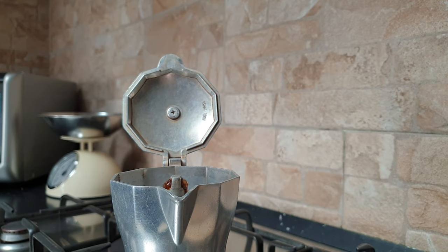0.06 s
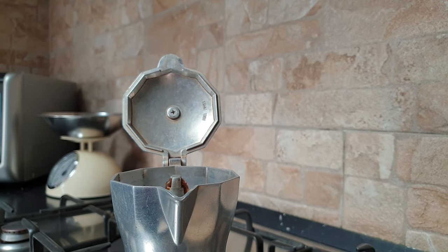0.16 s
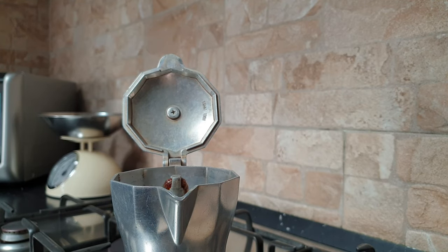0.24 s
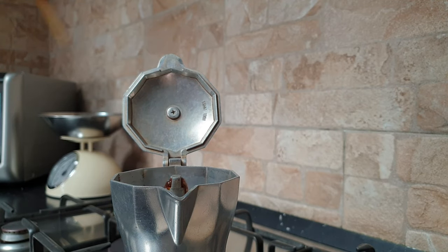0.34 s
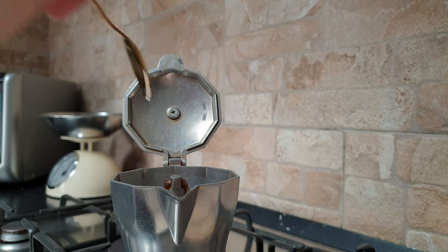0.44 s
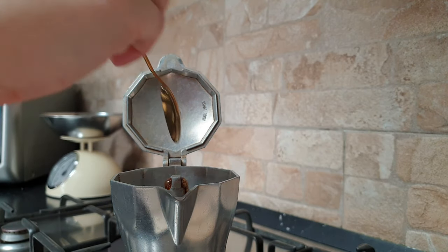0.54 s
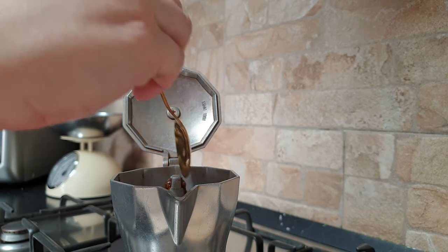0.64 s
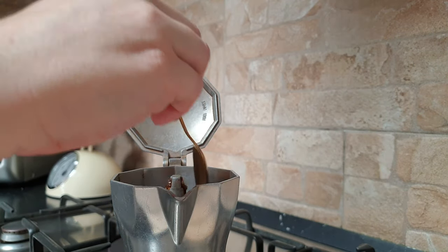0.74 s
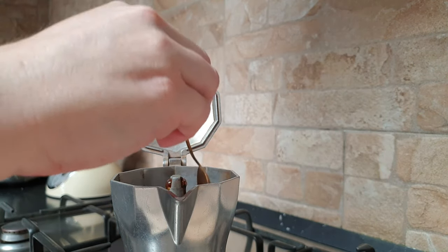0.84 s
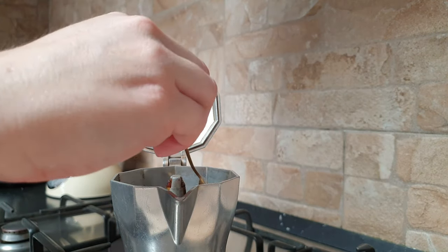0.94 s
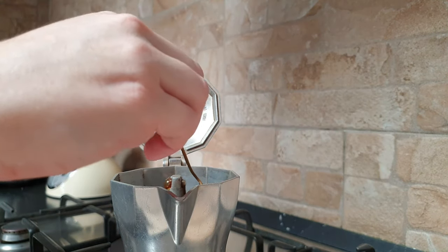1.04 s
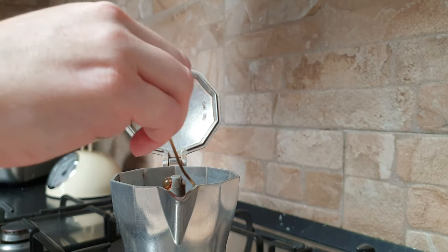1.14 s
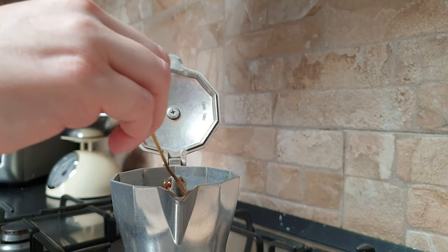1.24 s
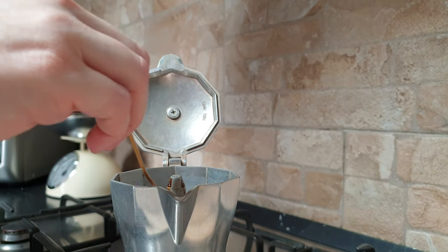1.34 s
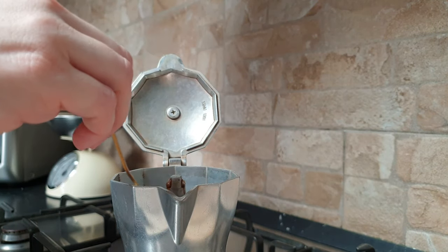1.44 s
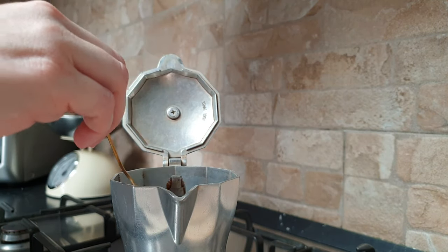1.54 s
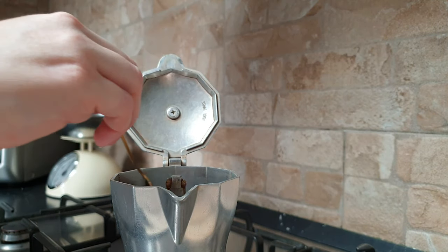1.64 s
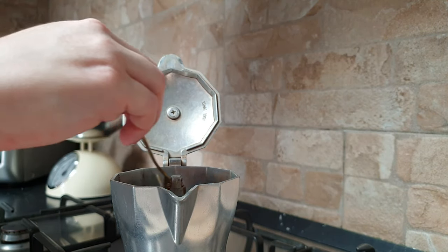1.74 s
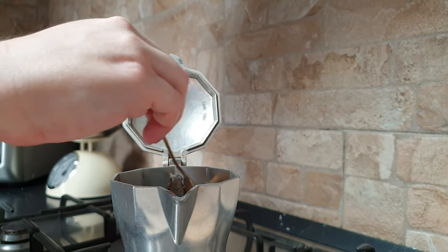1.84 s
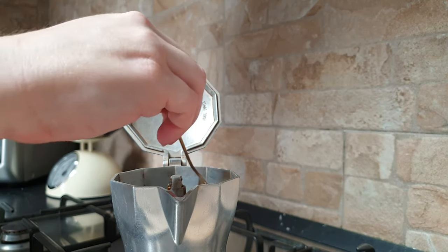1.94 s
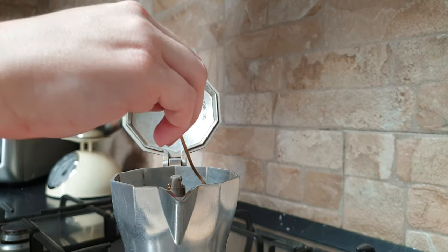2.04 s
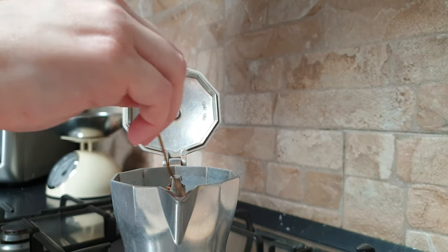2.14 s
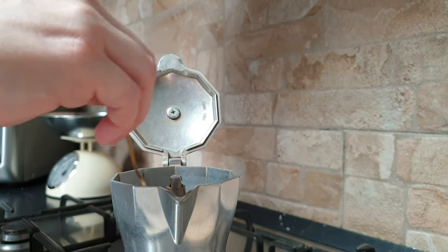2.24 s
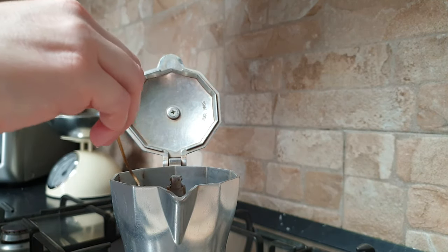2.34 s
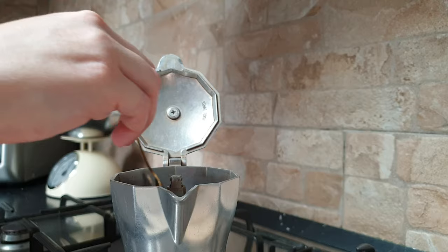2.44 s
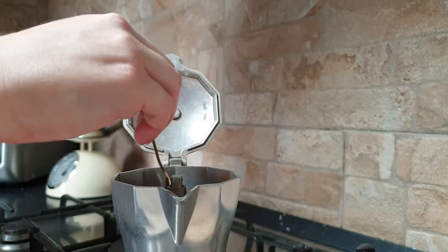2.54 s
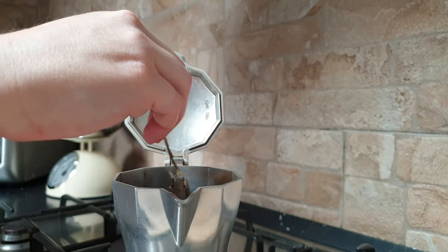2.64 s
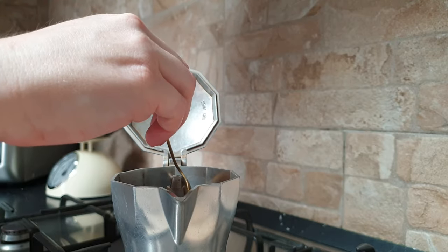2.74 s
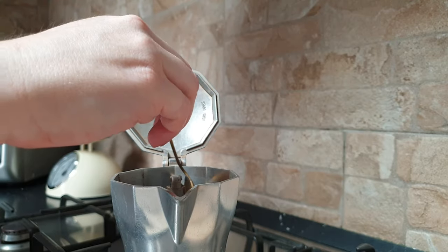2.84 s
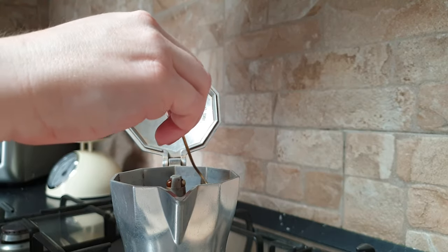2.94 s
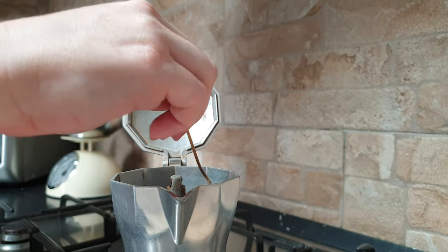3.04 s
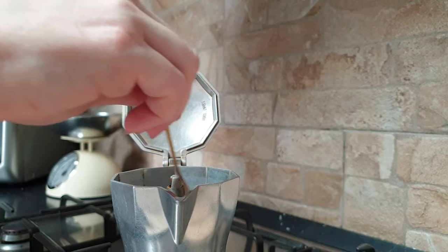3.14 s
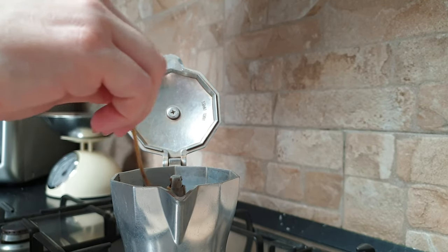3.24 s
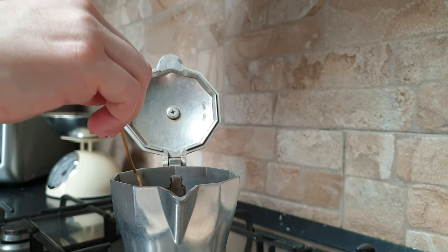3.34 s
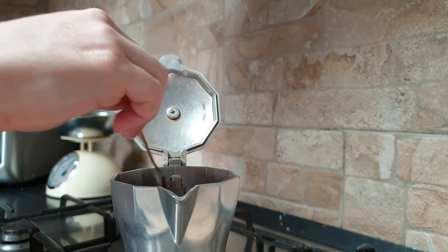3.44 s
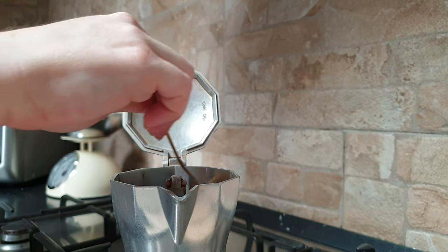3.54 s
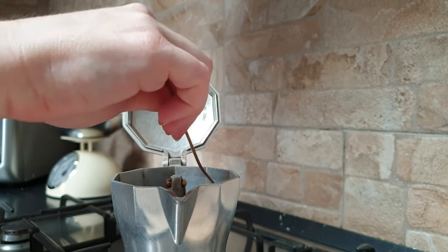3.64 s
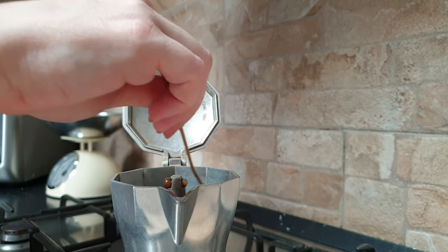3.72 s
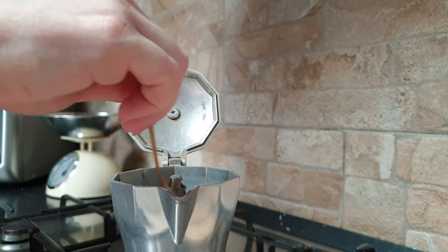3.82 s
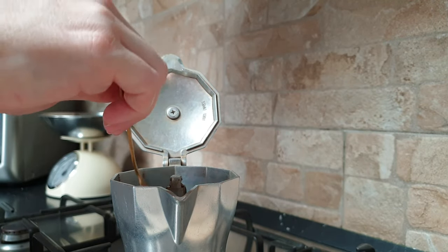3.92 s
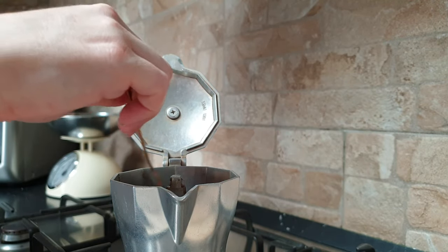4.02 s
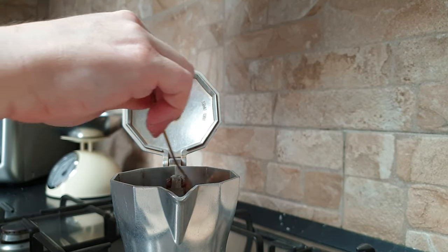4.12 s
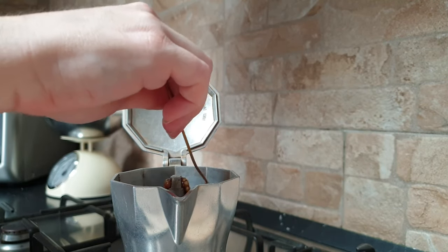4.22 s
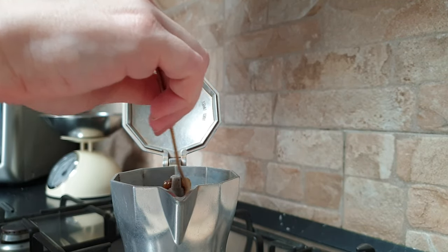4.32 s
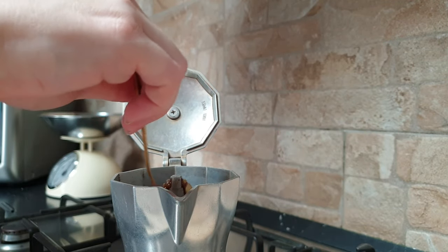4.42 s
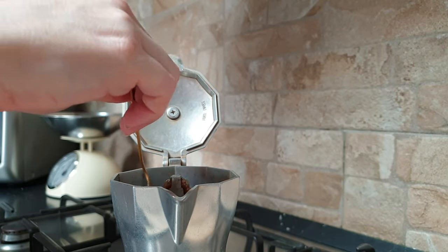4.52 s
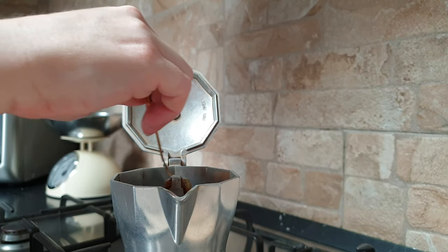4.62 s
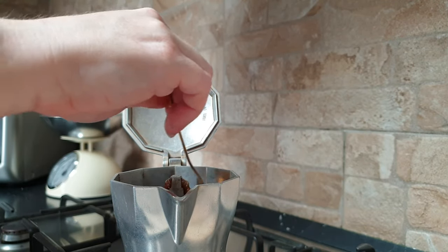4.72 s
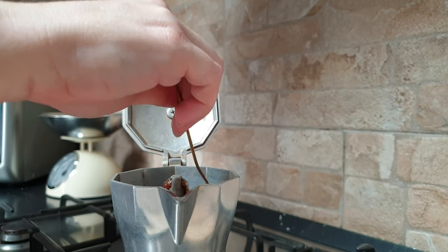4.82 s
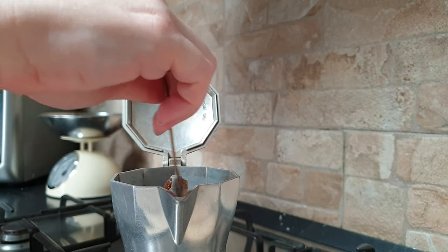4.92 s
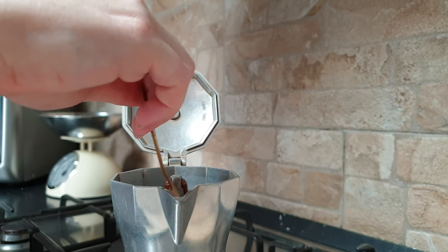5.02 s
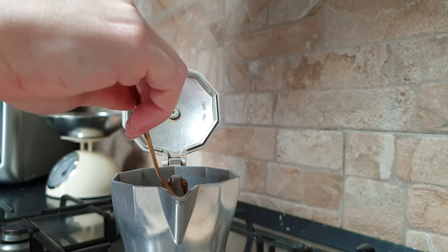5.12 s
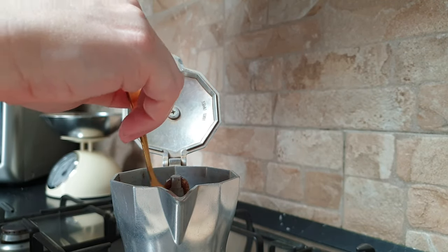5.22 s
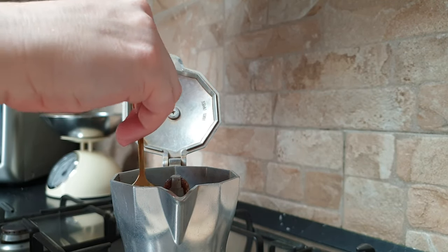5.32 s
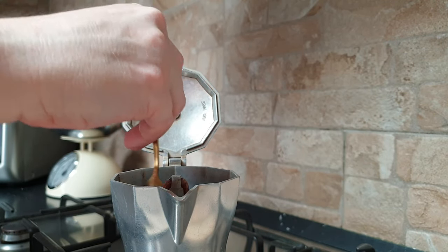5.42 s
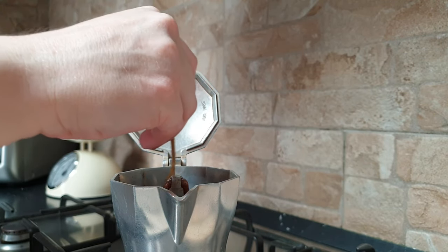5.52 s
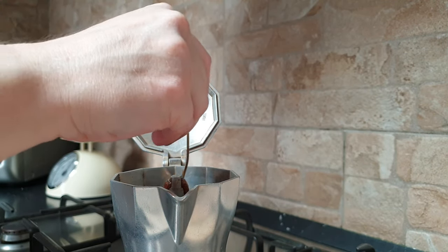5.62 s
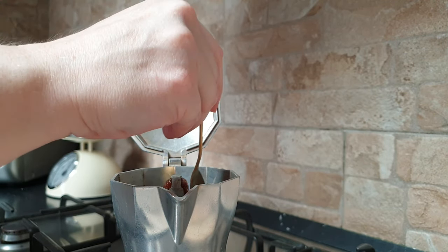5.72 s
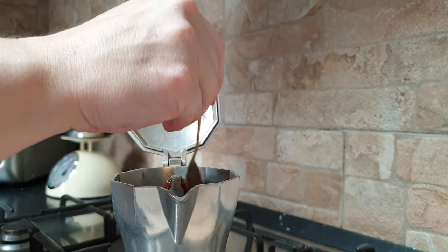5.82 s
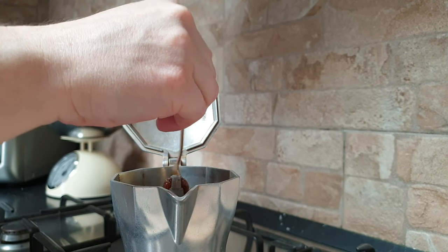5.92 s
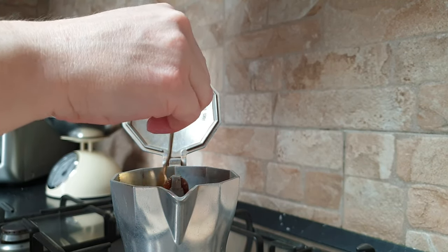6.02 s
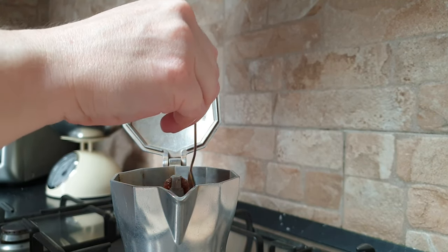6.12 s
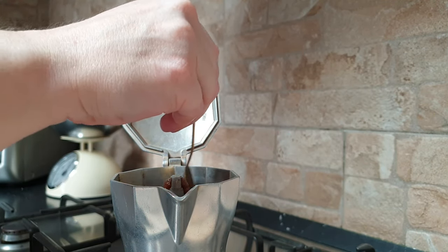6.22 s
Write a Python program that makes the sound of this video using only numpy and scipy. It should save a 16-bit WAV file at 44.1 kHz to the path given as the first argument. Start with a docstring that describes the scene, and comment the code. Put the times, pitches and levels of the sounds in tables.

```python
"""A steel teaspoon stirs coffee in a small aluminium pot on a kitchen stove, near a two-port microphone.
Impacts and stroke-by-stroke friction on the faceted wall excite the modes of pot and spoon, and soft
touches sound single notes. The pot rings like a bell near 3 kHz and rocks on the stove grid.
Two short hisses come first. Tiled walls reverberate; mains hum and soft room noise lie under all."""
import sys
import numpy as np
from scipy import signal
from scipy.fft import rfft, irfft, next_fast_len
from scipy.io import wavfile
from scipy.ndimage import map_coordinates

SR = 44100
rng = np.random.default_rng(int(sys.argv[2]) if len(sys.argv) > 2 else 0)


def store_wav(level_fs):
    """Save 16-bit WAV to argv[1]."""
    pcm = np.round(np.clip(np.atleast_2d(level_fs), -1, 1) * 32767)
    wavfile.write(sys.argv[1], SR, pcm.T.astype(np.int16))


N = 276507

# Room noise spectrum: f/Hz, level/dB
ROOM_SPECTRUM = [(12, -83.5), (20, -31), (30, -9.5), (53, -9), (123, -17.5), (158, -13), (228, -21),
                 (293, -16.5), (446, -10.5), (574, -24), (1570, -30.5), (3340, -38.5), (9140, -37.5),
                 (14000, -30.5), (16000, -40)]
# Likeness of the room noise at the two ports: f/Hz, correlation
ROOM_CORRELATION = [(60, 0.2), (240, 0.99), (950, 0.16), (3770, -0.1), (15000, 0.1)]
# Mains harmonics: f/Hz, level/dB
MAINS_PARTIALS = [(49.7, -67.5), (99.5, -78)]
# Hisses: t/s, level/dB
HISS_EVENTS = [(0.376, -63.5), (0.78, -58)]
# Hiss spectrum: f/Hz, level/dB
HISS_SPECTRUM = [(1180, -39), (2000, -15), (2740, -29), (3040, -14.5), (4730, -9.5), (10100, -8),
                 (16000, -11)]
# Reverberation time of the kitchen: f/Hz, T60/s
KITCHEN_T60 = [(200, 0.36), (3000, 0.25), (12000, 0.24)]
# Strokes: t/s, rise/s, hold/s, wall level/dB, then bell, treble and rocking level/dB re wall,
# and the most strongly driven wall f/Hz
DRAG_STROKES = [(1.12, 0.011, 0.09, -62, 8.5, -4.5, -6, 875),
                (1.259, 0.0026, 0.086, -64, 11.5, 7.5, -1, 920),
                (1.4, 0.075, 0.25, -67, -14, -27, -0.3, 600),
                (1.675, 0.01, 0.076, -45.5, -5.5, -5, -16.5, 1540),
                (2.057, 0.067, 0.04, -54, -2, -13.5, -19, 1170),
                (2.176, 0.026, 0.12, -52, 0, -12, -16, 1040),
                (2.389, 0.12, 0.016, -44.5, -8, -7, -14, 1380),
                (2.649, 0.023, 0.0067, -51, 2.5, 0, -1.5, 1210),
                (2.76, 0.003, 0.023, -49.5, -18.5, -4.5, 2.5, 570),
                (2.883, 0.0026, 0.13, -54, -3, -14, -7, 780),
                (3.084, 0.066, 0.015, -52, -0.5, -17, -16, 1050),
                (3.18, 0.0048, 0.12, -49.5, -2.5, -7.5, -16, 1080),
                (3.364, 0.003, 0.17, -55.5, -22, -4.5, -2, 580),
                (3.463, 0.0042, 0.042, -40.5, -1, -0.5, -15.5, 1400),
                (3.628, 0.035, 0.092, -57.5, -15.5, -10, -25, 690),
                (3.75, 0.0039, 0.078, -51, -3, 2.3, -25, 1240.0),
                (3.847, 0.044, 0.064, -49.5, -9, -9, -16.5, 670),
                (4.017, 0.01, 0.057, -57.9, -9.0, -0.5, -5.6, 680.0),
                (4.088, 0.0047, 0.024, -39, -2.0, -4.5, -20, 1205),
                (4.214, 0.025, 0.36, -54.5, 2.5, -15.5, -29, 1020),
                (4.423, 0.005, 0.1, -56.5, -1, -0.5, -6.5, 950),
                (4.606, 0.019, 0.12, -47, -3.3, -4, -28, 1250.0),
                (4.793, 0.02, 0.11, -54, 3.5, -16, -14, 980),
                (4.907, 0.0049, 0.028, -48.5, 1, -4, -5.7, 1020),
                (4.956, 0.004, 0.03, -54, 3, -21, -8, 740),
                (5.081, 0.0046, 0.077, -53, 8.5, -6, -12.5, 590),
                (5.226, 0.047, 0.014, -51, 9, -6, -15, 815), (5.368, 0.012, 0.11, -55.1, -8.5, -9, -4, 685),
                (5.511, 0.01, 0.051, -52.5, -22, -19, -17, 1060.0),
                (5.66, 0.008, 0.09, -57, -16, -31, -26, 1030.0),
                (5.861, 0.0059, 0.17, -44.5, -1.5, 1, -18, 1740),
                (6.091, 0.003, 0.024, -47, 1.5, -2.5, -10.5, 1590),
                (6.246, 0.01, 0.037, -46.5, -3.5, -5.5, -25, 1880)]
# Knocks: t/s, bell level/dB, wall level/dB re bell, grit level/dB re bell
SPOON_KNOCKS = [(1.1328, -47.5, -7, -10.5), (1.2638, -43.5, -35, -3.5), (1.3103, -43.5, -13, -12.5),
                (1.3391, -42.5, -15, -23), (1.6931, -45, -3, -22), (2.5266, -30, -9, -8.5),
                (2.7232, -37.5, -26, -16.5), (2.7604, -46.5, 4.5, 4), (2.8824, -56, 8, 7.5),
                (3.187, -40, -12, 0), (3.3576, -50, 9, 2.5), (3.466, -32.5, -4, -4),
                (3.7516, -59.5, 6, 7.5), (4.091, -39.5, -3, -3.5), (4.3755, -40.5, -10, -17.5),
                (4.4187, -22.5, -17.5, -22.5), (4.8705, -41, -15, -18.5), (4.9107, -35.5, -1, -2),
                (4.9809, -37, -1.5, -10), (5.0734, -17.5, -18, -18), (5.2292, -46.5, -31, -42.5),
                (5.8611, -38, 2, 4.5), (5.8955, -33.5, -16, -8), (6.0864, -36.5, -3.5, -2.5),
                (6.1043, -29, -14, -9)]
# Modes of the pot's bell-like ring, its wall, its rim and the spoon: f/Hz, bandwidth/Hz, level/dB
BELL_MODES = [(2961, 36, -2), (3027, 55, -5), (3150, 98, 7), (3410, 110, -0.5)]
WALL_MODES = [(345.3, 9, -4.5), (422, 25, 0), (510.6, 34, -1), (602, 93, -1), (728.4, 20, 0.5),
              (845, 90, -0.5), (1166, 133, 1.5), (1380, 56, 0.5), (1523, 163, 3.5), (1767, 51, -7),
              (1825, 41, -4), (2100, 93, 4), (2270, 81, -3), (2440, 280, -4)]
RIM_MODES = [(3620, 36, 6), (4760, 48, -15), (4920, 97, 1), (5250, 360, -1.5), (5700, 200, -12),
             (6670, 140, -2.5)]
SPOON_MODES = [(7400, 170, -17), (8570, 220, -5), (9890, 170, 7.5), (11340, 125, 2.5), (11410, 91, 6.5),
               (12600, 70, -20), (13630, 160, -34)]
# Contact high on the wall favours the lower bell modes: wall f/Hz, bell f/Hz
WALL_TO_BELL = [(1150, 3120), (1500, 2934)]
# Spectrum of the fine grit between the modes: f/Hz, level/dB
GRIT_SPECTRUM = [(4120, -25), (7000, -21.5), (9140, -5.5), (13900, 1), (16000, -8.5)]
# Modes of the base on the stove grid: f/Hz, bandwidth/Hz, level/dB
GRID_MODES = [(164.9, 11.1, 3.5), (211.6, 10, -6), (278, 76, -8)]
# Dull bumps through the worktop: t/s, level/dB
WORKTOP_BUMPS = [(2.799, -45), (2.901, -50.5), (3.003, -55)]
# Soft touches, one note of the pot each: t/s, f/Hz, level/dB, T60/s
TOUCH_NOTES = [(2.115, 1169, -36, 0.084), (2.183, 1176, -34, 0.04), (2.765, 429, -43.5, 0.18),
               (3.855, 3157, -29.5, 0.052), (3.875, 3128, -30, 0.069), (3.884, 407, -45, 0.24),
               (4.228, 3170, -38, 0.051), (4.99, 200, -50, 0.18), (5.38, 1480, -50, 0.066),
               (5.52, 720, -47.5, .25), (5.565, 1185, -48, .08), (5.672, 723, -54, 0.18),
               (5.718, 1180, -50, 0.13), (6.11, 605, -52.5, 0.13)]
# Phase lead of the left port: f/Hz, phase/rad
PORT_PHASE = [(100, -0.5), (1120, 1.32), (2070, 1.26), (3100, 1.5), (4900, 4), (6600, 7), (16000, 8.5)]
# Left port minus right port: f/Hz, level/dB
PORT_LEVEL = [(60, -12.5), (180, -1.5), (550, 3.5), (1650, 5.5), (4970, 3.5), (15000, -3)]
# Decay of a stroke as pressure eases, and once the spoon lifts:
# rate/(dB/s) for bell, wall, scratch, grit, rocking
EASING_RATES = [51, 25.4, 56, 53, 18]
LIFTING_RATES = [170, 150, 200, 180, 72]


def amp(db):
    """Amplitude ratio of a level in dB."""
    return 10 ** (np.asarray(db) / 20)


def unit(x):
    """Normalisation to rms 1."""
    return x / np.sqrt(np.mean(x ** 2) + 1e-20)


def along(points, hz):
    """Interpolation of (f/Hz, value) points on a logarithmic frequency axis."""
    f, v = np.transpose(points)
    return np.interp(np.log(hz + 1), np.log(f + 1), v)


def wobble(rate):
    """Random modulation: a spline through `rate` Gaussian knots a second."""
    return map_coordinates(rng.standard_normal(int(N * rate / SR) + 4), [np.arange(N) * rate / SR])


def filtered(x, response):
    """Linear filtering: the spectrum of x times a complex frequency response."""
    m = next_fast_len(N + SR // 2)
    return irfft(rfft(x, m) * response(np.fft.rfftfreq(m, 1 / SR)), m)[..., :N]


def modes(table):
    """Modal superposition: damped resonances of alternating sign, with unit power gain for white noise."""
    def response(f):
        h = sum((-1) ** k * amp(db) * 1j * f * width / (hz * hz - f * f + 1j * f * width)
                for k, (hz, width, db) in enumerate(table))
        return h / np.sqrt(np.mean(np.abs(h) ** 2))
    return response


def envelope(start, rise, hold, sag_db_per_s, fade_db_per_s, start_db=-11.5):
    """Exponential growth and decay: a rise, a hold that sags through gain 1, then a fade."""
    t = np.arange(N) / SR - start - rise
    held = np.clip(t, 0, hold)
    db = start_db * np.clip(-t / rise, 0, None) - sag_db_per_s * (held - hold / 2)
    db -= fade_db_per_s * np.clip(t - held, 0, None)
    return amp(np.maximum(db, -200))


def room_noise():
    """Partial coherence: mid and side noise mix so that the ports are alike only in the bass."""
    def mid_and_side(f):
        angle = np.arccos(along(ROOM_CORRELATION, f)) / 2
        return amp(along(ROOM_SPECTRUM, f)) * [np.cos(angle), np.sin(angle)]
    mid, side = filtered(rng.standard_normal((2, N)), mid_and_side)
    return amp(-65) * unit(np.array([mid + side, mid - side]))


def mains_hum():
    """Harmonics of the mains: two tones, slightly amplitude-modulated and stronger on the right."""
    t = np.arange(N) / SR
    hum = sum(np.sqrt(2) * amp(db + 0.5 * wobble(2)) * np.sin(2 * np.pi * hz * t)
              for hz, db in MAINS_PARTIALS)
    return hum * amp([[-1.6], [1.6]])


def hisses():
    """Broadband noise in two short airy puffs, probably steam from the spout."""
    level = sum(amp(db) * envelope(start, rise=0.015, hold=0.047, sag_db_per_s=0, fade_db_per_s=128)
                for start, db in HISS_EVENTS)
    puff = rng.standard_normal(N) + 1.8 * rng.standard_normal((2, N))
    return level * unit(filtered(puff, lambda f: amp(along(HISS_SPECTRUM, f))))


def direct_sound(x):
    """Phase and level differences: the pot reaches the left port first, and each port has its colour."""
    side = np.array([[.5], [-.5]])
    gain = lambda f: amp(side * along(PORT_LEVEL, f) + 1)
    return filtered(x, lambda f: gain(f) * np.exp(1j * side * along(PORT_PHASE, f)))


def reverberation(x):
    """Reflection from tiled walls: a diffuse tail in which each frequency decays at its own rate."""
    hz, t, noise = signal.stft(rng.standard_normal((2, SR // 2)), SR, nperseg=256)
    decay = amp(-60 * t / along(KITCHEN_T60, hz)[:, None])
    tail = signal.istft(noise * decay, SR, nperseg=256)[1]
    delayed = np.pad(x, ((0, 0), (130, 0)))  # about 3 ms
    return signal.fftconvolve(delayed, tail / np.linalg.norm(tail[0]), axes=1)[:, :N]


def strokes(rock_lag_s=0.027):
    """Incoherent strokes add in power: gives five drive amplitudes and the power-weighted wall pitch."""
    power, weighted_log_hz = np.full((5, N), 1e-20), 0
    for start, rise, hold, wall_db, bell_db, treble_db, rock_db, hz in DRAG_STROKES:
        # bell, wall, scratch, grit, rocking
        levels = wall_db + np.array([bell_db, 0, treble_db - 5.5, treble_db - 5, rock_db])
        for k, db in enumerate(levels):
            lag = rock_lag_s * (k == 4)  # the heavy base answers late
            drive = amp(db) * envelope(start, rise + lag, hold, EASING_RATES[k], LIFTING_RATES[k])
            power[k] += drive ** 2
            if k == 1:
                weighted_log_hz += drive ** 2 * np.log(hz)
    wall_hz = np.maximum(np.exp(weighted_log_hz / power[1]), WALL_MODES[0][0])
    return np.sqrt(power), wall_hz


def friction(grain_db, slip_db):
    """Sliding friction: a noise force whose size jumps from grain to grain and from slip to slip."""
    return unit(rng.standard_normal(N) * amp(grain_db * wobble(900) + slip_db * wobble(45)))


def knocks():
    """Impact forces on bell, wall, rim and spoon: an impulse, then decaying chatter against the wall."""
    force, t = np.zeros((4, N + SR)), np.arange(SR // 4) / SR
    t60 = np.array([[.015], [.05], [.09], [.07]])
    for start, db, wall_db, grit_db in SPOON_KNOCKS:
        blow = amp(-8 - 60 * t / t60) * rng.standard_normal((4, len(t)))
        blow[:, 0] = amp([16.04, 14.6, 9.7, 7.2])  # the impulse
        gains = amp(db + np.array([[8], [wall_db + 7], [grit_db + 8.5], [grit_db + 9]]))
        force[:, round(start * SR):][:, :len(t)] += gains * blow
    return force[:, :N]


def ring(force, table, drift_db, swing_db, coupling=lambda hz: 1):
    """Modal coupling: as the contact travels, each mode's share drifts and swings between the ports."""
    shares = np.array([coupling(hz) * amp(db + drift_db * wobble(11)) for hz, _, db in table])
    shares /= np.sqrt(np.sum(shares ** 2, axis=0))  # the squared shares sum to 1
    sway = lambda: amp(swing_db * wobble(5.5) * np.array([[.5], [-.5]]))
    return sum((-1) ** k * filtered(force * shares[k], modes([mode])) * sway()
               for k, mode in enumerate(table))


def stirring(drive, wall_hz):
    """Forced vibration: friction and impacts drive the same modes; the contact point picks the strongest."""
    near = lambda centre, octaves: lambda f: 0.52 + np.exp(-.5 * (np.log2(f / centre) / octaves) ** 2)
    # Noise radiated from many spots of the metal is uncorrelated at the two ports.
    spread = lambda x: x * [rng.choice([-1, 1], N), np.ones(N)]
    drag = drive * [friction(0.81, 2.1), friction(1.5, 2.56), friction(3.9, 0.83), friction(3.8, 1.5)]
    blows, spot = knocks(), modes([(3010, 310, 0)])
    ping = amp(-27) * filtered(filtered(blows[0], spot), spot)  # the struck spot, before the pot rings
    bell, wall, scratch, grit = blows + drag
    bell = .22 * filtered(bell, modes([(2934, 504, 0)]))  # the curved wall responds over a few cycles
    broadband = amp(-3.5) * filtered(spread(grit), lambda f: unit(amp(along(GRIT_SPECTRUM, f))))
    broadband += amp(-4) * filtered(spread(scratch), modes([(5530, 4100, 0)]))
    bell_hz = along(WALL_TO_BELL, wall_hz)
    ringing = ring(bell, BELL_MODES, drift_db=5, swing_db=4.5, coupling=near(bell_hz, 0.03))
    wall = 0.8 * wall + 0.34 * spread(wall)
    ringing += ring(wall, WALL_MODES, drift_db=4.5, swing_db=4, coupling=near(wall_hz, 0.71))
    ringing += ring(1.01 * scratch, RIM_MODES, drift_db=3, swing_db=4)
    ringing += ring(0.43 * grit, SPOON_MODES, drift_db=10, swing_db=7.5)
    return ringing + broadband + ping


def rocking(drive):
    """Friction excites low resonances: the base shifts on the iron grid with a dull rumble."""
    return filtered(drive * friction(1.5, 1.5), modes(GRID_MODES))


def touches(rise_s=0.013, waver_db=3):
    """Damped oscillation of a single mode: each softly touched note swells, wavers and dies."""
    notes, t = np.zeros(N + SR), np.arange(SR // 2) / SR
    for start, hz, db, t60 in TOUCH_NOTES:
        swell = 2 * amp(db - 60 * t / t60) * (1 - np.exp(-t / rise_s))
        notes[round(start * SR):][:len(t)] += swell * np.sin(2 * np.pi * hz * t)
    return notes[:N] * amp(waver_db * wobble(70))


def worktop_thuds():
    """Impulse response: a few bumps excite one low, heavily damped mode of the worktop."""
    bumps = np.zeros(N)
    for start, db in WORKTOP_BUMPS:
        bumps[round(start * SR)] = amp(db + 25)
    return filtered(bumps, modes([(58.4, 44, 0)]))


def scene():
    """Superposition of the pot's direct and reverberant sound with the steady background."""
    drive, wall_hz = strokes()
    pot = stirring(drive[:4], wall_hz) + rocking(drive[4]) + touches() + worktop_thuds() + hisses()
    return direct_sound(pot) + amp(-9.5) * reverberation(pot) + room_noise() + mains_hum()


def record(dry):
    """Band limiting: an ideal low-pass filter removes the highest treble."""
    return filtered(dry, lambda hz: hz < 15900)


dry = scene()
out = record(dry)
store_wav(out)
```